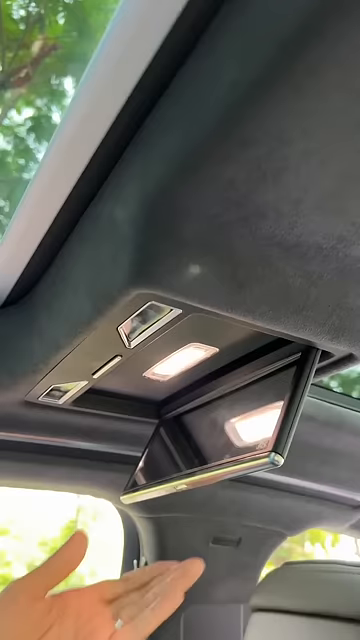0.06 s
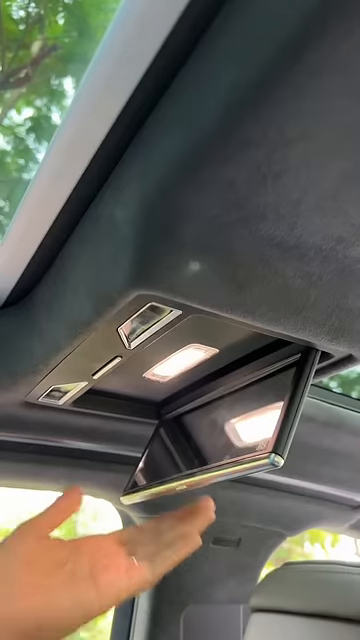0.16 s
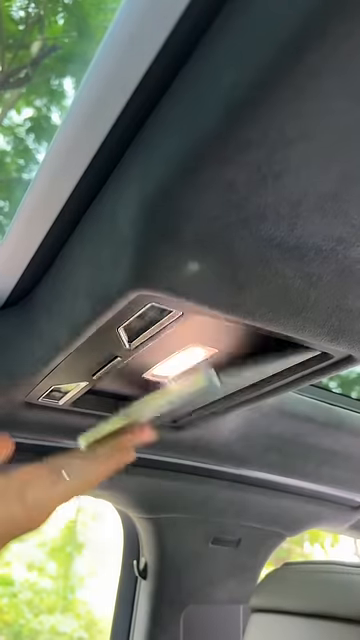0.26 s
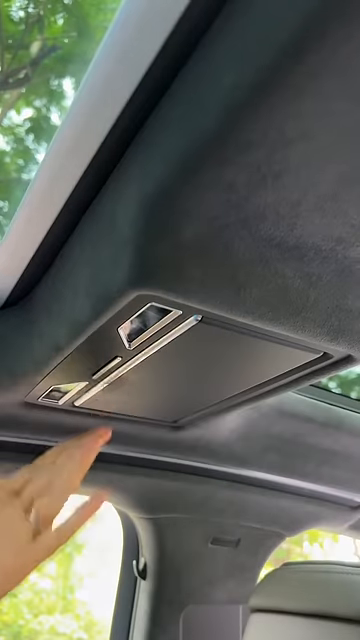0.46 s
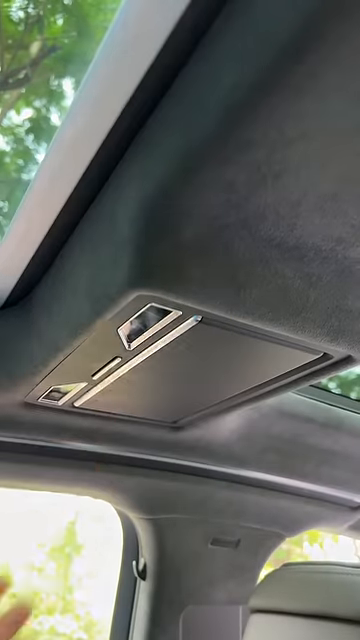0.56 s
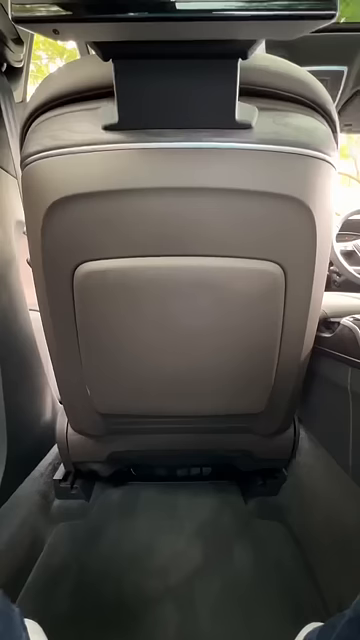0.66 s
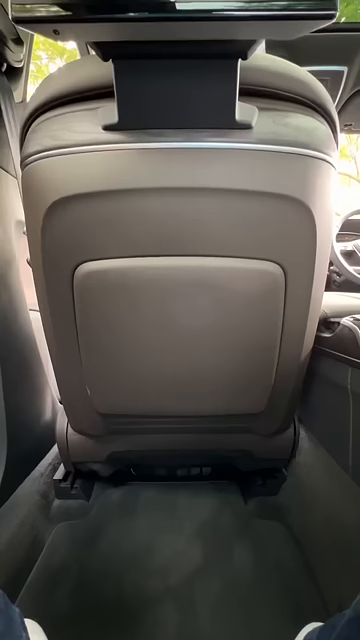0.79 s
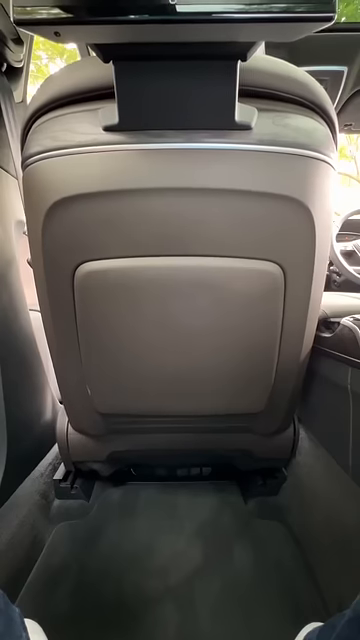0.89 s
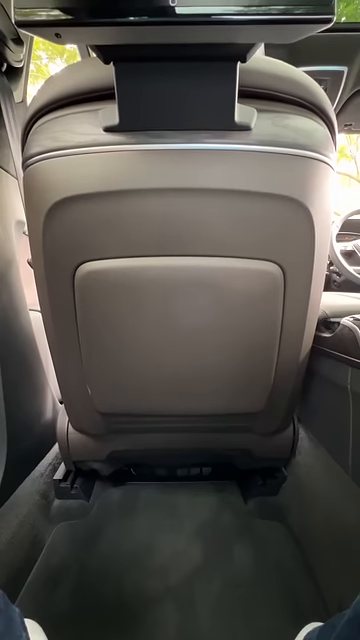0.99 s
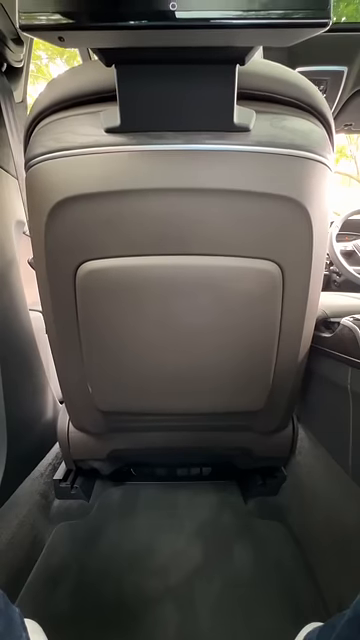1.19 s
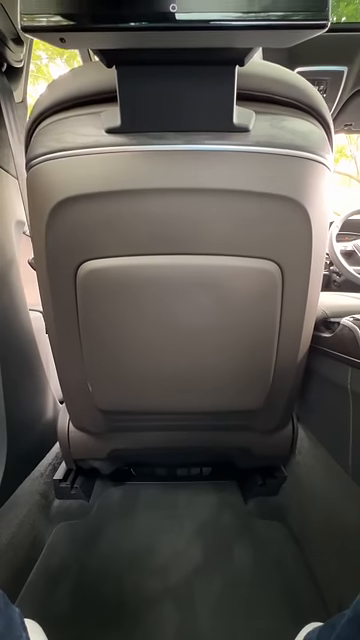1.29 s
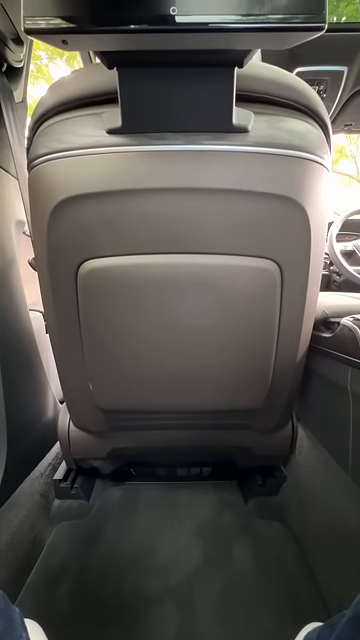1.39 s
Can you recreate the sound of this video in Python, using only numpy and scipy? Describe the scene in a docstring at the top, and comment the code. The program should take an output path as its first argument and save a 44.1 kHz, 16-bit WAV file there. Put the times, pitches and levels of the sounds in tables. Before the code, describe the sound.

A fold-down ceiling panel is pushed shut inside a parked car: a light clack, then a loud, close plastic snap with a dull boom. Faint trim clicks, a soft knock and a low motor hum follow.

```python
"""Inside a parked car, a hand pushes a fold-down ceiling panel shut. The lid clacks and scrapes home,
then the latch snaps, its housing rings and the roof lining booms, overloading the microphone.
The scene changes to behind a front seat: small trim clicks, a soft knock and a low motor hum.
Contacts are bursts of coloured noise with a duller cabin tail; struck parts ring as decaying sines."""
import sys
import numpy as np
from scipy import signal
from scipy.fft import rfft, irfft
from scipy.io import wavfile
from scipy.ndimage import uniform_filter1d

SR = 44100
rng = np.random.default_rng(int(sys.argv[2]) if len(sys.argv) > 2 else 0)


def to_wav(sig):
    """Store sig (one row per channel, or 1-D mono) as 16-bit WAV at the path in sys.argv[1].

    Samples outside -1..1 are clipped; the rate is SR.
    """
    pcm = np.clip(np.atleast_2d(sig), -1, 1) * 32767
    pcm = np.round(pcm).astype(np.int16)
    wavfile.write(sys.argv[1], SR, pcm.T)  # frames by channels


N = 63945
T = np.arange(N) / SR
FREQS = np.fft.rfftfreq(N, 1 / SR)
CHANGE_S = .61  # cut to behind the seat
CABIN_T60_S = .07

# stereo image: f/Hz, left-right correlation
CORRELATION = [(100, 1), (300, 0.99), (450, 0.44), (600, 0.38), (850, -0.2), (1200, 0.519), (2000, 0.64),
               (3800, 0.093), (6500, 0.7), (8800, -.1), (11000, -0.49), (14000, 0.44)]


def undb(db):
    """Decibels to gain."""
    return 10 ** (np.asarray(db) / 20)


def at_hz(points, hz):
    """Look up a spectrum table on a log-frequency axis."""
    freqs, values = np.array(points, float).T
    return np.interp(np.log(np.maximum(hz, 1)), np.log(freqs), values)


def fader(points):
    """A level curve as gain over time."""
    return undb(np.interp(T, *np.array(points, float).T))


def pan(hz):
    """Left and right gains at these frequencies."""
    # left minus right: f/Hz, level/dB
    balance = [(80, 0), (300, -2), (1100, -0.5), (2200, -0.44), (4000, 0.9), (12000, -0.36)]
    return undb(np.array([[.5], [-.5]]) * at_hz(balance, hz))


def noise(colour, tilt_db=0, diffuse_share=.4):
    """Coloured stereo noise of rms 1: partly diffuse, partly one wave reaching the sides out of step."""
    mid, diffuse = rfft(rng.standard_normal((2, N)))
    side = np.sqrt(diffuse_share) * diffuse - 1j * np.sqrt(1 - diffuse_share) * mid
    alike = at_hz(CORRELATION, FREQS)
    pair = mid * np.sqrt(1 + alike) + np.array([[1], [-1]]) * side * np.sqrt(1 - alike)
    gain = undb(at_hz(colour, FREQS) + tilt_db * np.log2(np.maximum(FREQS, 300)))
    x = irfft(pair * gain * pan(FREQS), N)
    return x / x.std()


def envelope(start, t60, rise):
    """A quick attack and an exponential decay, all times in seconds."""
    age = np.maximum(T - start, 0)
    return (1 - np.exp(-age / rise)) * np.exp(-np.log(1000) * age / t60)


def drift(rate_hz):
    """Smooth random modulation with a spread of 1."""
    hold = int(SR / rate_hz)
    steps = np.repeat(rng.standard_normal(N // hold + 1), hold)
    smooth = uniform_filter1d(uniform_filter1d(steps, hold), hold)[:N]
    return smooth / smooth.std()


def ring(modes, start, rise, gain_db):
    """Struck modes of alternating sign; the high ones reach left and right out of step."""
    out = 0
    for k, (hz, db, t60) in enumerate(modes):
        skew = np.arccos(at_hz(CORRELATION, hz)) * np.array([[-.5], [.5]])
        tone = np.sin(2 * np.pi * hz * (T - start) + skew)
        out += (-1) ** k * undb(db) * pan(hz) * envelope(start, t60, rise) * tone
    return undb(gain_db) * out


def cracks(contacts, colour, tail_db, tail_t60, rise, dull_db_per_octave=2.2):
    """Each contact is a short crack with the duller tail of the upholstered cabin."""
    out = 0
    for start, db, tilt_db, t60 in contacts:
        tail = envelope(start, tail_t60, .001) * noise(colour, tilt_db - dull_db_per_octave)
        crack = envelope(start, t60, rise) * noise(colour, tilt_db)
        out += undb(db) * (crack + undb(tail_db) * tail)
    return out


def cabin():
    """The room tone of the closed car, a little fuller behind the seat."""
    # room tone under the panel: f/Hz, level/dB
    panel_colour = [(25, -19), (60, 2), (120, -2), (190, -16.5), (270, -12.5), (450, -23), (620, -31),
                    (1120, -27.5), (1400, -45.5), (2400, -42), (2900, -36.5), (3300, -47.5), (3750, -36.5),
                    (4200, -46.5), (4900, -44), (6500, -54), (16000, -76.5)]
    # its dip and recovery: t/s, level/dB
    panel_level = [(0, -4.5), (.06, -12), (.16, -8), (.4, -0.5), (.6, -2)]
    # room tone behind the seat: f/Hz, level/dB
    seat_colour = [(25, 8), (110, 3), (200, -10.5), (400, -28), (800, -54), (2500, -56), (12000, -45),
                   (13000, -72), (16000, -80)]
    under_panel = undb(-42) * fader(panel_level) * noise(panel_colour)
    behind_seat = undb(-43.5) * noise(seat_colour)
    crossfade = np.clip((T - CHANGE_S) / .02, 0, 1)
    return (1 - crossfade) * under_panel + crossfade * behind_seat


def lid_clack():
    """The hand meets the open lid and sets it ringing on its hinge."""
    # hand contacts: t/s, level/dB, tilt/(dB per octave), t60/s
    taps = [(.179, -34.5, -1, 0.11), (.1828, -24, -1.5, 0.025), (.1928, -19, 0.5, 0.0143)]
    # colour of the lid: f/Hz, level/dB
    colour = [(150, -5.5), (400, 0), (750, 2.5), (1300, -7.5), (2900, -0.5), (4800, -10), (5900, -3),
              (7000, -11), (8200, -5), (10500, -14), (12300, -12), (13500, -26.5), (16000, -30)]
    # lid modes: f/Hz, level/dB, t60/s
    modes = [(88, -13.5, .11), (142, -14.5, .15), (246, -33, 0.23), (330, -22, 0.1), (403, -19, .08),
             (654, -34, .06), (730, -30.5, .06), (1002, -33, .05), (1835, -30, .04)]
    clack = cracks(taps, colour, tail_db=-12.5, tail_t60=CABIN_T60_S, rise=.00036)
    return clack + ring(modes, start=.1911, rise=.0055, gain_db=2.13)


def lid_scrape(grain_db=3):
    """The lid rubs in its frame in uneven grains, hardest just before the latch snaps."""
    # colour of the rubbing: f/Hz, level/dB
    colour = [(100, -1), (300, 5.5), (700, 2.5), (1500, -3), (2700, -6), (4500, -5.5), (5500, -11),
              (8000, -11), (12000, -13.5), (13500, -31)]
    # the lid slides home and settles: t/s, level/dB
    level = [(.18, -74), (.21, -60.5), (.245, -55.5), (.268, -46.5), (.281, -28.5), (.3, -44.5),
             (.335, -54.5), (.39, -53.5), (.425, -100)]
    return fader(level) * undb(grain_db * drift(300)) * noise(colour)


def latch(housing_t60=.078):
    """The plastic latch snaps in, rings its housing and rattles briefly."""
    # snap and rattle contacts: t/s, level/dB, tilt/(dB per octave), t60/s
    contacts = [(.2831, -3.5, 0.45, .02), (.2862, -5, 0.1, 0.015), (.2878, -5, -4.5, 0.024),
                (.331, -38, -5.5, 0.024), (.344, -38, -6, 0.051), (.359, -33.5, -7, .04)]
    # colour of the plastic: f/Hz, level/dB
    plastic = [(150, -11), (400, -4.5), (800, -8.5), (1500, -8.5), (2700, 0), (4300, -2.5), (5100, -10.5),
               (6100, -4.5), (8500, -9), (12200, -8.5), (13500, -20), (16000, -16.5)]
    # housing modes: f/Hz, level/dB
    housing = [(977, -9), (1176, -1), (1258, -1), (1440, -10), (1724, -7), (1835, -5), (2086, -4),
               (2562, 0), (2859, 1), (3061, 0), (3268, -6), (3857, -4), (4015, -5), (4626, -5)]
    snap = cracks(contacts, plastic, tail_db=-9, tail_t60=CABIN_T60_S, rise=.00015)
    modes = [(hz, db, housing_t60) for hz, db in housing]
    return snap + ring(modes, start=.2865, rise=.00057, gain_db=-18.5)


def roof_boom():
    """The roof lining and the cabin air boom as the panel shuts."""
    # lining and air modes: f/Hz, level/dB, t60/s
    modes = [(53, -15, .5), (74, -8, .27), (94, -7, .13), (154, -16, .26), (195, -4, .08), (222, -9, .17),
             (233, -13, .13), (257, -3, .11), (330, -2, .05), (384, -9, .12), (494, -19, .12),
             (438, -6, .05), (569, -21, .09)]
    return ring(modes, start=.2856, rise=.0036, gain_db=2.08)


def motor_rush():
    """The motor's soft rushing and a low rumble come in at the cut, swell and ease off."""
    # colour of the rushing: f/Hz, level/dB
    rush_colour = [(25, -6), (80, -14), (150, 7.5), (185, -11.5), (300, -1.5), (480, -6), (650, -16),
                   (1000, -26), (2000, -31.5), (4500, -45.5), (9500, -42), (12000, -39), (13000, -64),
                   (16000, -76)]
    # its swell: t/s, level/dB
    rush_level = [(.69, -58.5), (.73, -47.5), (.8, -39.5), (.86, -38), (.93, -45.5), (1.05, -42.5),
                  (1.15, -44.5), (1.45, -45)]
    # colour of the rumble: f/Hz, level/dB
    rumble_colour = [(20, -19), (45, -3), (110, -2), (170, -4), (300, -19.5), (1000, -83)]
    # its surges: t/s, level/dB
    rumble_level = [(.6, -47.5), (.82, -38.5), (.9, -32), (.94, -37.5), (1., -31.5), (1.1, -34.5),
                    (1.15, -53), (1.45, -56)]
    rush = fader(rush_level) * noise(rush_colour)
    rumble = fader(rumble_level) * noise(rumble_colour)
    return np.clip((T - CHANGE_S) / .01, 0, 1) * (rush + rumble)


def trim_clicks():
    """Trim near the seat gives small clicks; one of them rings a hollow piece."""
    # trim contacts: t/s, level/dB, tilt/(dB per octave), t60/s
    contacts = [(.6975, -37, -7.5, 0.09), (.7235, -47.5, 5.5, 0.027), (.735, -45, -32, 0.045),
                (.759, -34, -1.5, 0.086), (.767, -26.5, -5.5, 0.055), (.7985, -44, 1.5, .045),
                (.8225, -34.5, -3.5, 0.047), (.841, -56, 11.5, 0.048), (.97, -45, -3, 0.12),
                (1.016, -45, -0.5, 0.091), (1.026, -47, 10, 0.024), (1.0305, -33, -3, .045),
                (1.044, -30.5, -1, 0.022), (1.059, -52, -6, .05), (1.292, -49, 11, 0.02)]
    # colour of the trim: f/Hz, level/dB
    colour = [(150, -5.5), (400, 9.5), (900, -1), (1600, -3), (3000, -5), (5000, -11.5), (9000, -13),
              (12000, -15), (13200, -23), (16000, -32)]
    # modes of the hollow piece: f/Hz, level/dB, t60/s
    hollow = [(537, -31, 0.085), (733, -31.5, 0.048), (1433, -33, .04), (1620, -28, 0.022),
              (1870, -35, 0.016), (2390, -31, 0.019)]
    clicks = cracks(contacts, colour, tail_db=-4.5, tail_t60=.13, rise=.0015)
    return clicks + ring(hollow, start=1.044, rise=.00068, gain_db=-2.5)


def motor_hum(start=.76, spin_up_s=.0612, waver=.008, flutter_db=1.7):
    """A small motor spins up to a hum that wavers in pitch and level."""
    # partials at full speed: f/Hz, rms level/dB
    partials = [(108, -45.5), (149, -48), (223, -53.5), (297, -50.5), (403, -51.5), (447, -45.5)]
    running = 1 - np.exp(-np.maximum(T - start, 0) / spin_up_s)
    speed = (1 - .12 * (1 - running)) * (1 + waver * drift(14))  # starts 12 % flat
    motor_time = np.cumsum(speed) / SR
    hum = 0
    for hz, db in partials:
        amplitude = np.sqrt(2) * undb(db + flutter_db * drift(26))
        hum += amplitude * np.sin(2 * np.pi * (hz * motor_time + rng.random()))
    return running * hum


def seat_knock():
    """A soft knock sets the seat back thudding."""
    # seat back modes: f/Hz, level/dB, t60/s
    modes = [(46.6, -16.5, .19), (58.3, -10.5, 0.19), (142, -29, .16), (281, -34, .12),
             (339.5, -11.5, 0.036), (1140, -32.5, 0.032)]
    return ring(modes, start=.7636, rise=.0069, gain_db=-1)


def scene():
    """The panel shuts, then the sounds behind the seat follow, all over room tone."""
    panel = lid_clack() + lid_scrape() + latch() + roof_boom()
    behind_seat = motor_rush() + trim_clicks() + motor_hum() + seat_knock()
    return cabin() + panel + behind_seat


def record(dry):
    """The microphone thins the deepest bass, soft-clips the loudest peaks and cuts the top."""
    low_cut = signal.butter(2, 20, "high", fs=SR, output="sos")
    high_cut = signal.ellip(8, .2, 70, 16000, fs=SR, output="sos")
    thinned = signal.sosfiltfilt(low_cut, dry, padtype="even")
    clipped = thinned / (1 + thinned ** 8) ** (1 / 8)
    return signal.sosfilt(high_cut, clipped)


dry = scene()
out = record(dry)
to_wav(out)
```